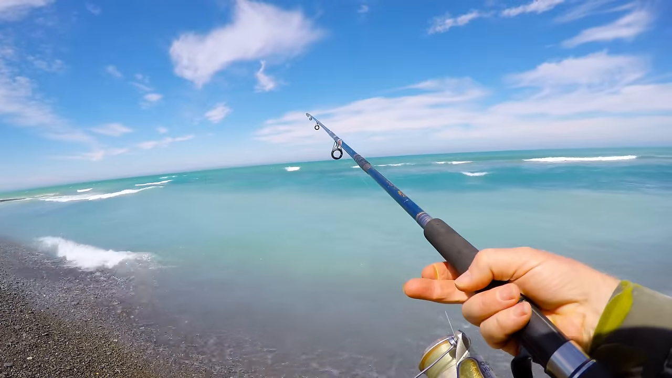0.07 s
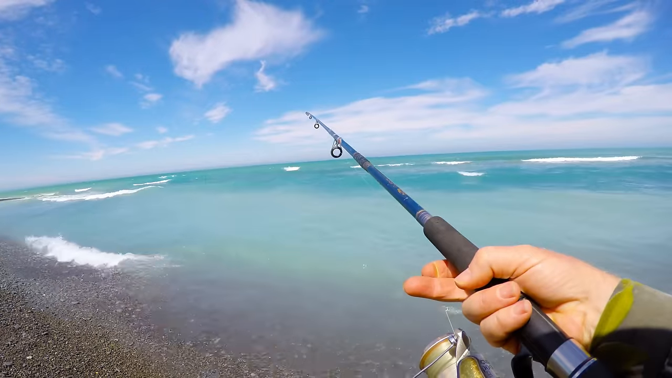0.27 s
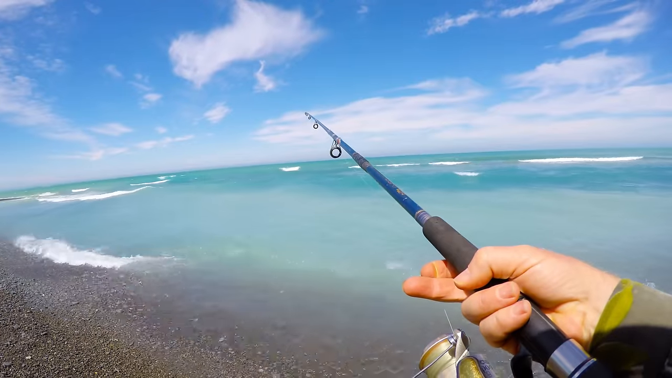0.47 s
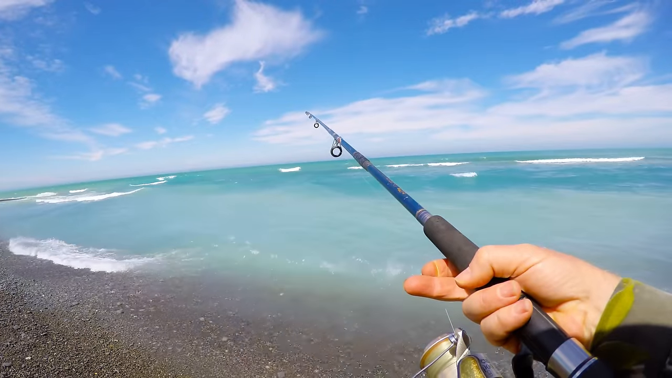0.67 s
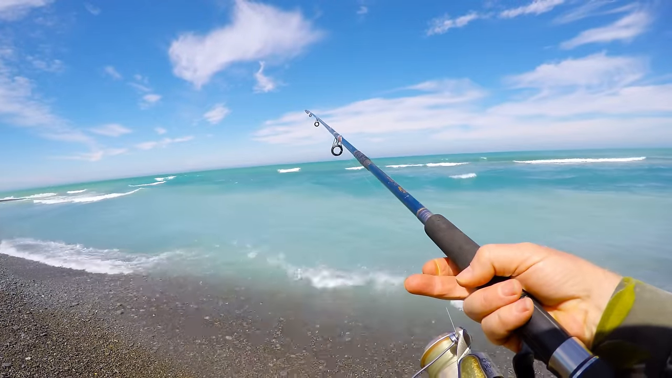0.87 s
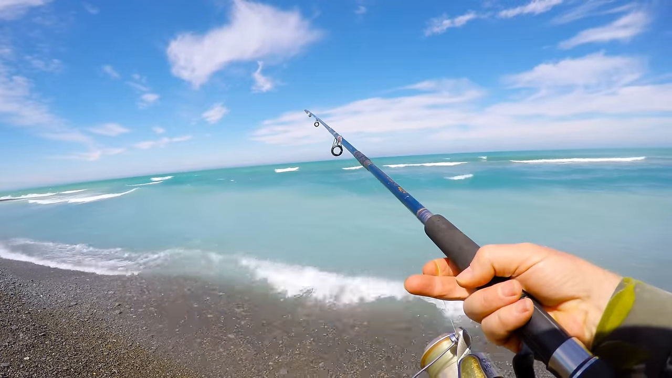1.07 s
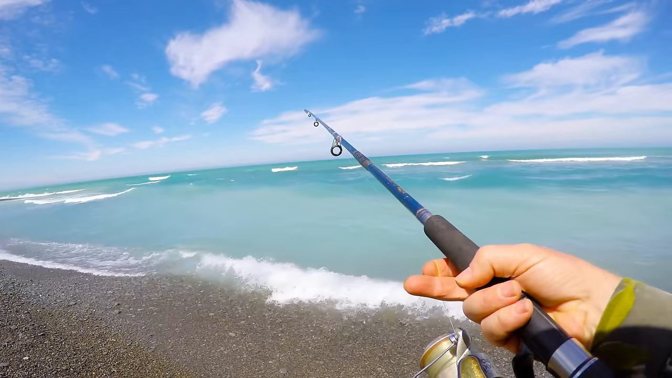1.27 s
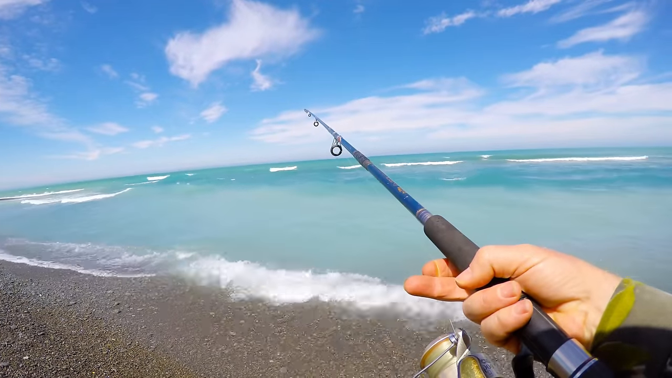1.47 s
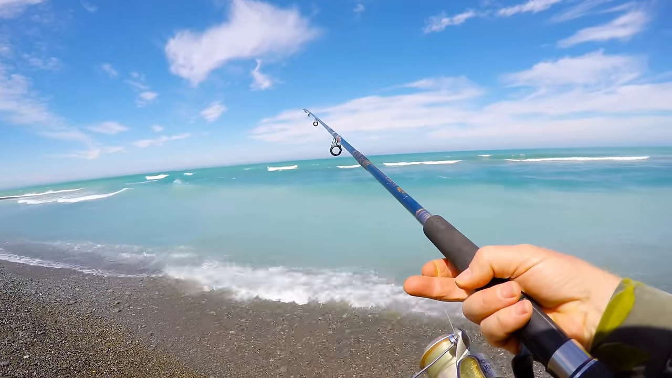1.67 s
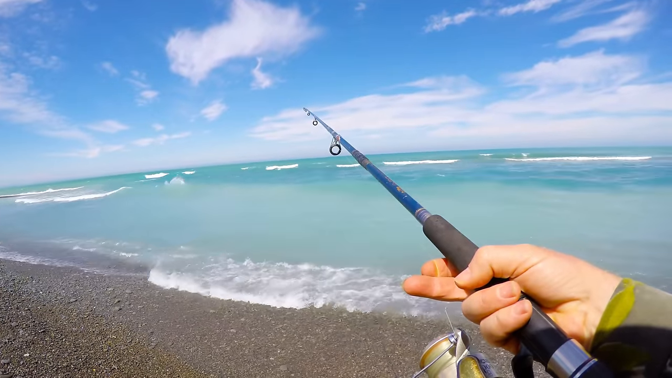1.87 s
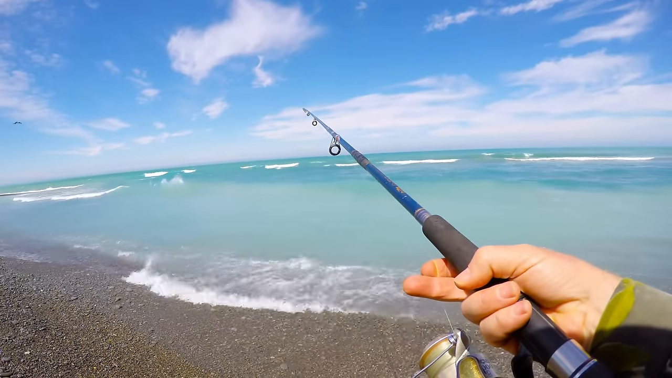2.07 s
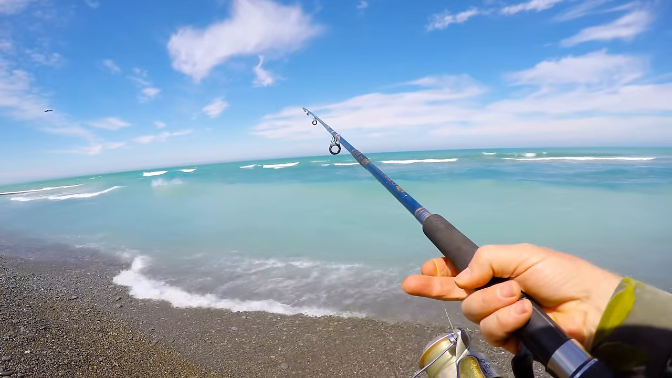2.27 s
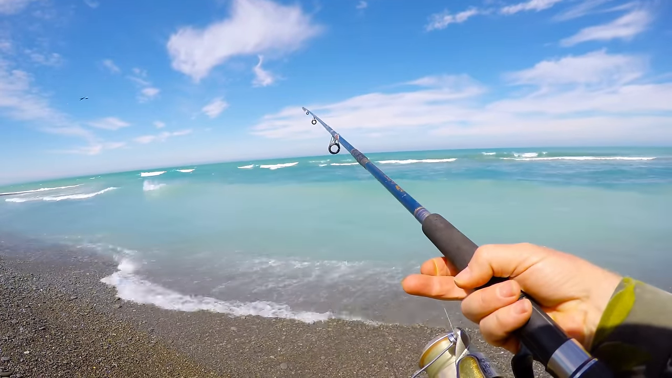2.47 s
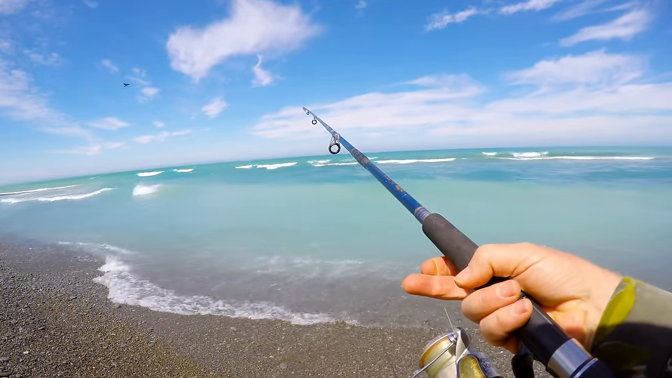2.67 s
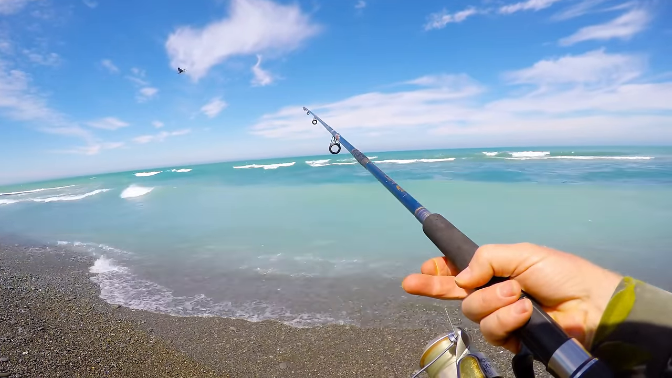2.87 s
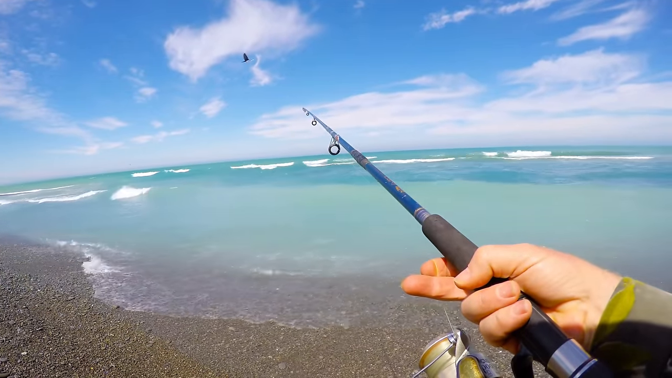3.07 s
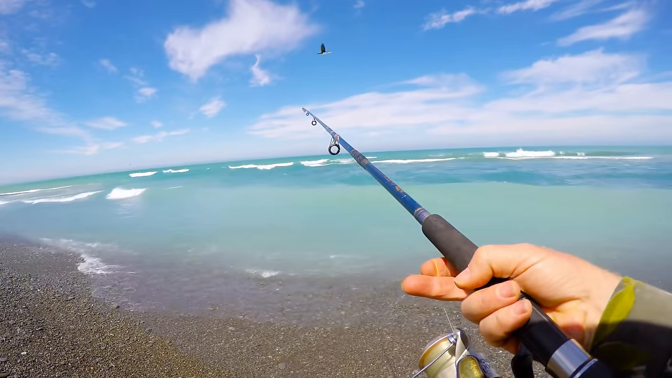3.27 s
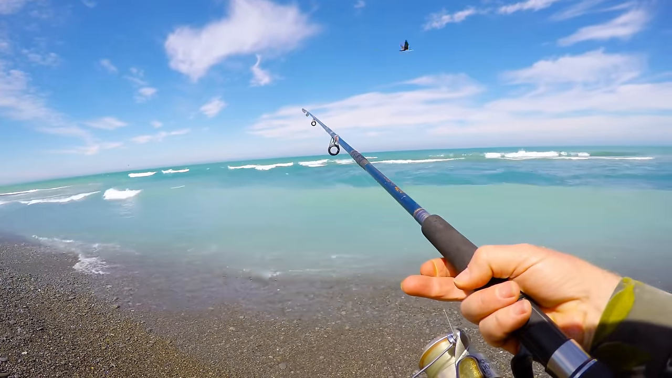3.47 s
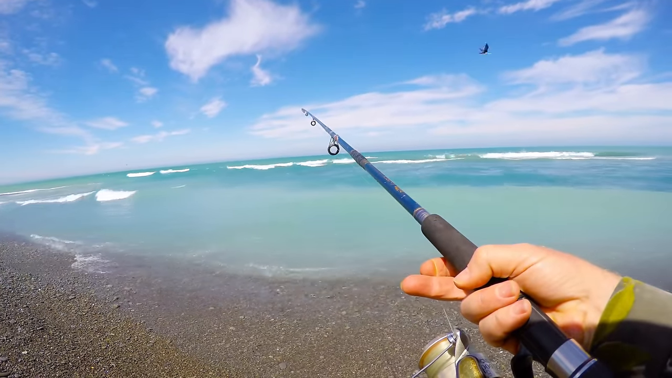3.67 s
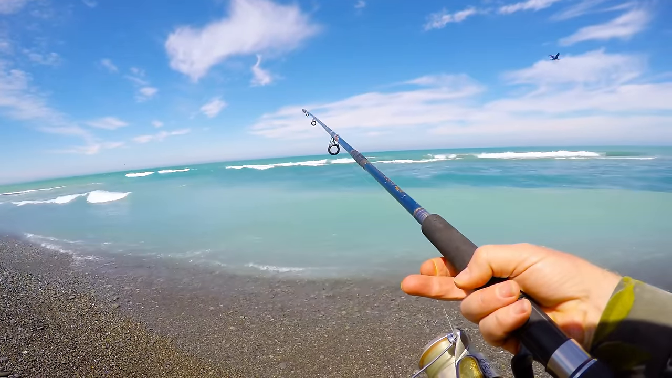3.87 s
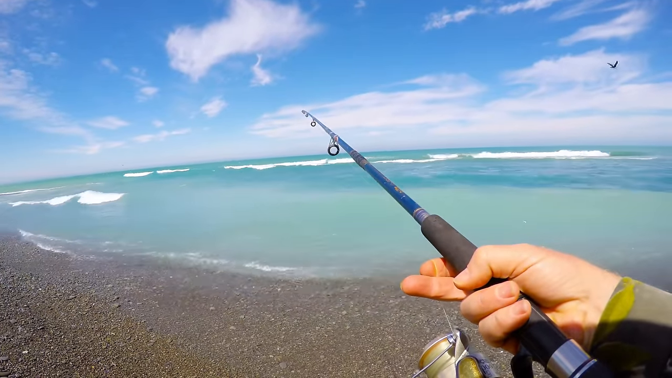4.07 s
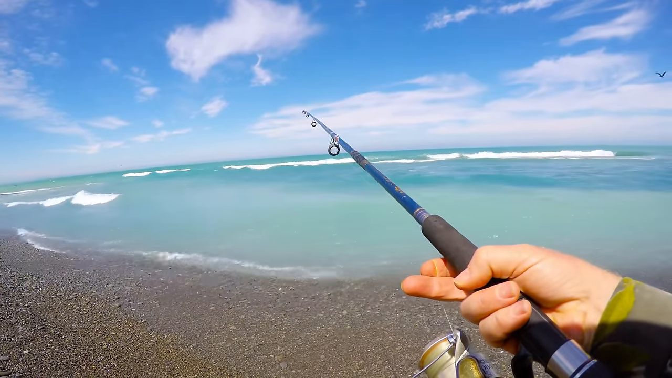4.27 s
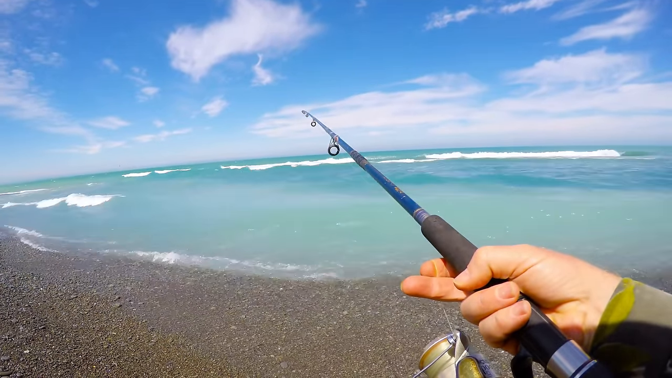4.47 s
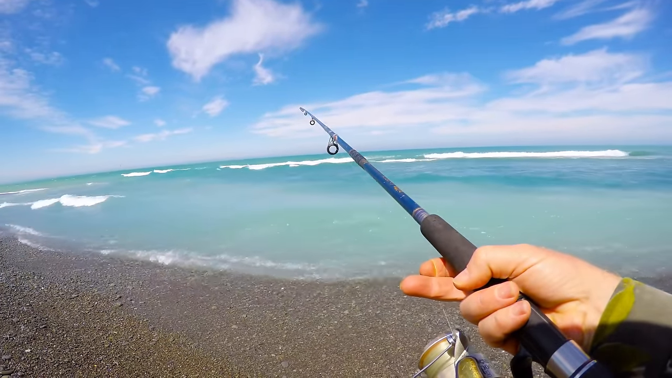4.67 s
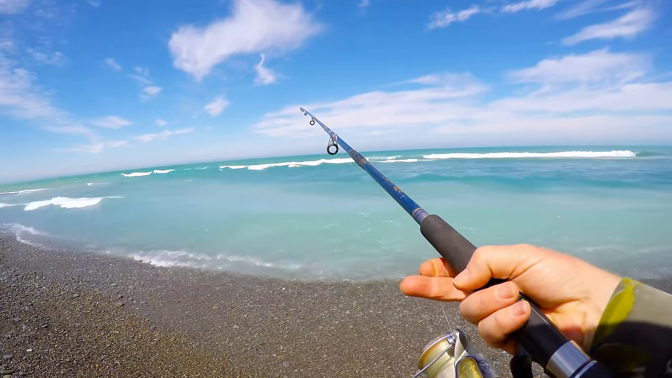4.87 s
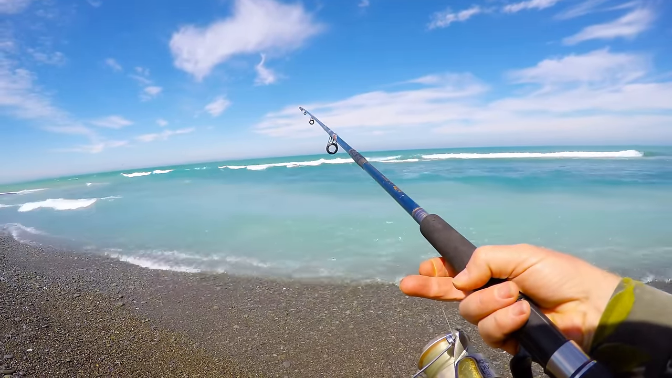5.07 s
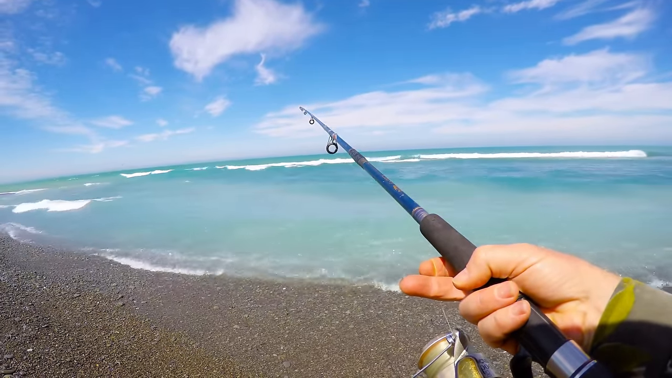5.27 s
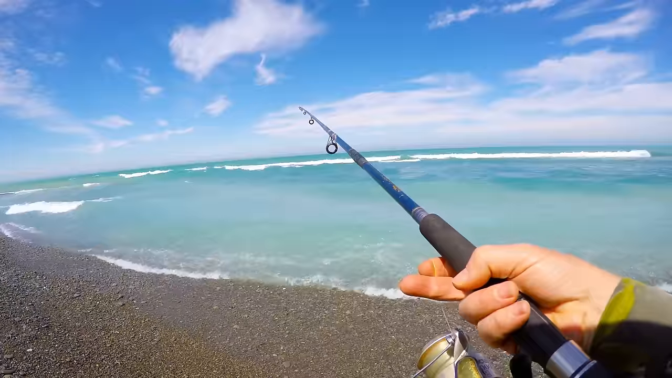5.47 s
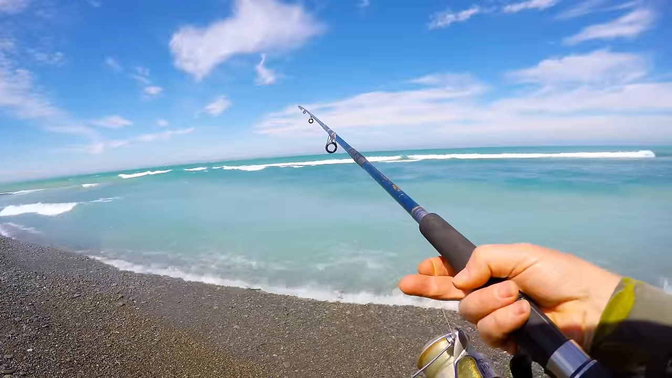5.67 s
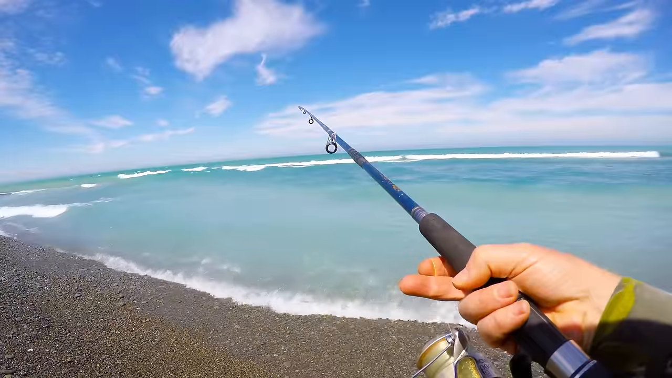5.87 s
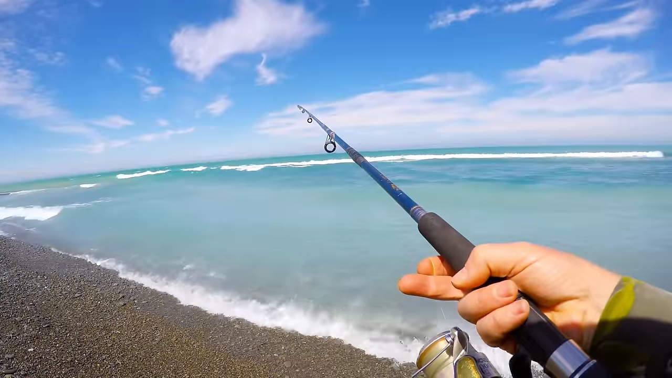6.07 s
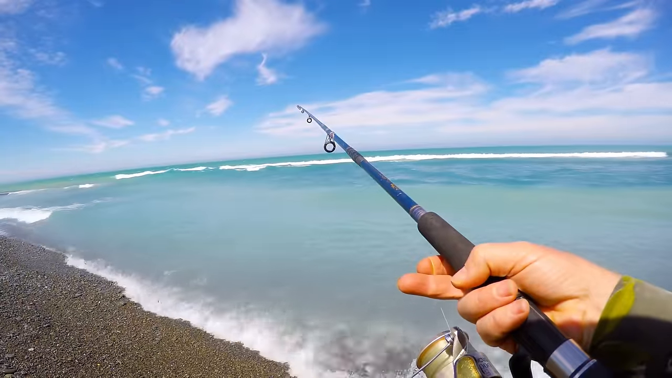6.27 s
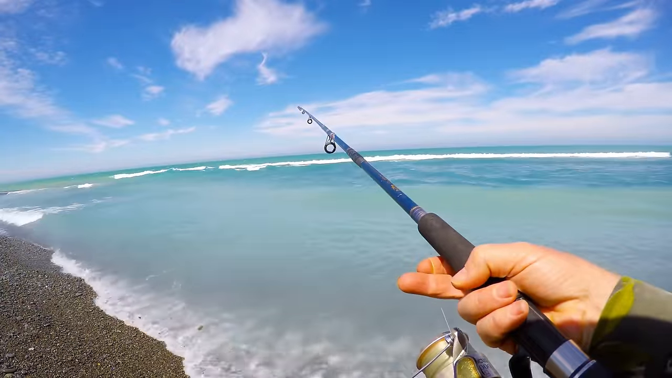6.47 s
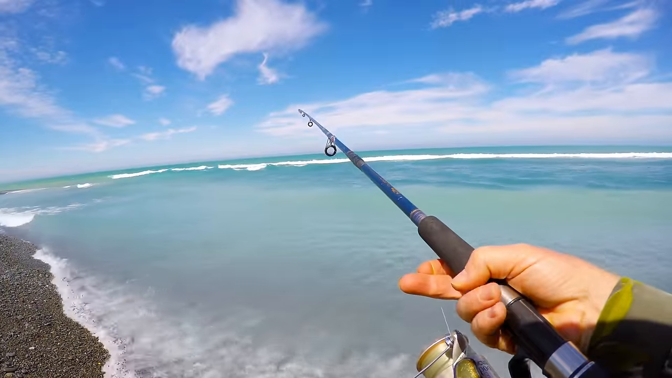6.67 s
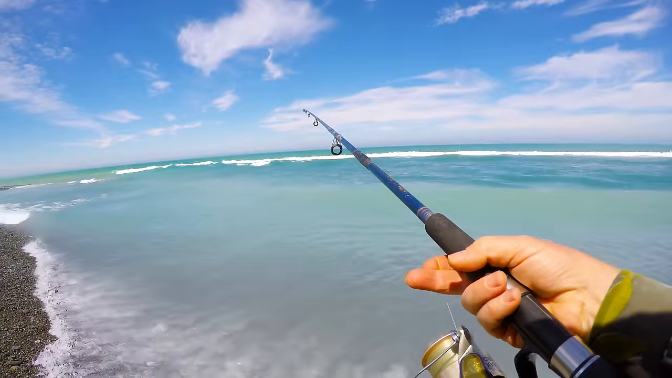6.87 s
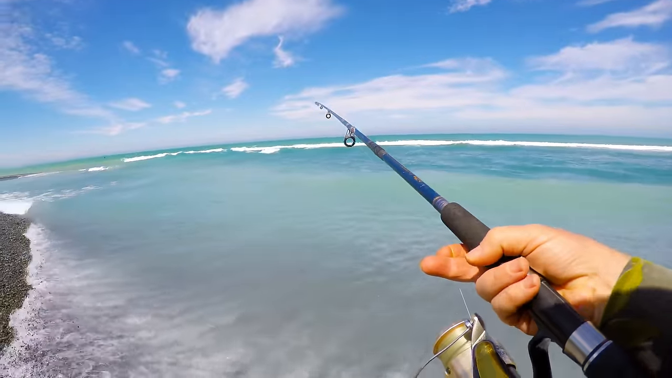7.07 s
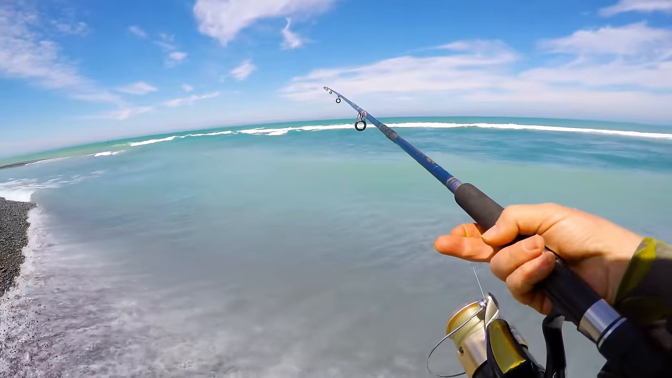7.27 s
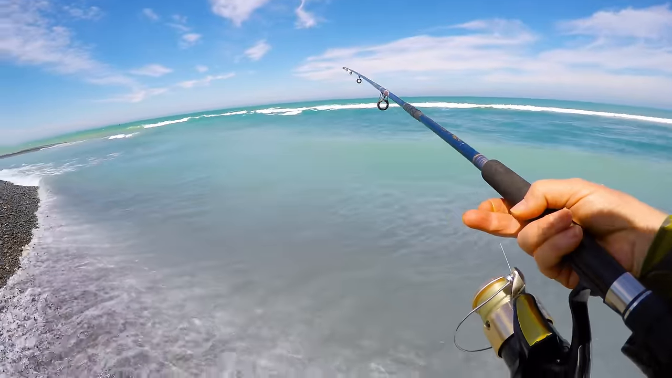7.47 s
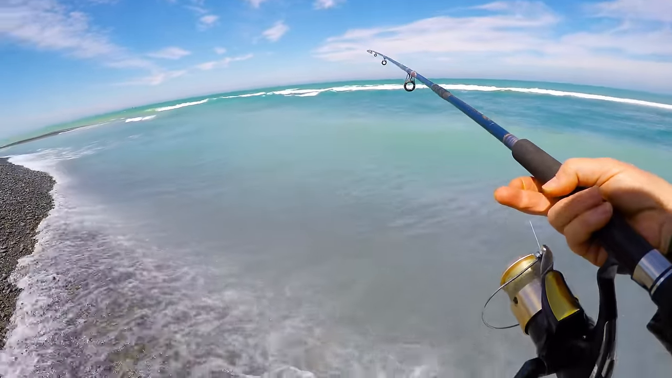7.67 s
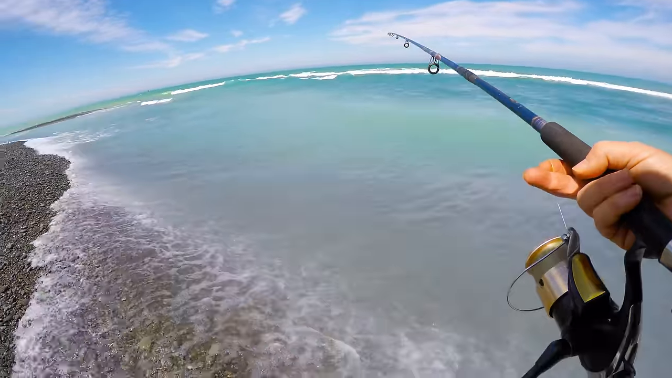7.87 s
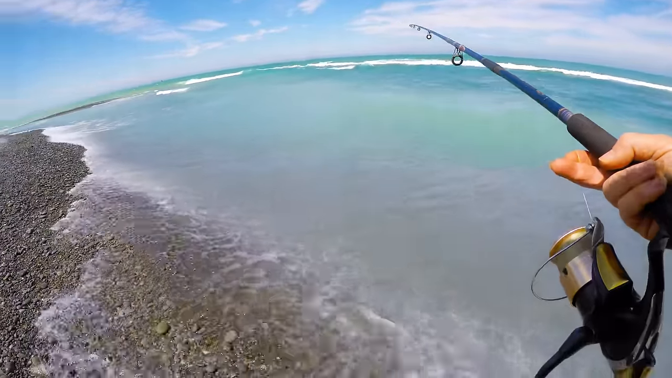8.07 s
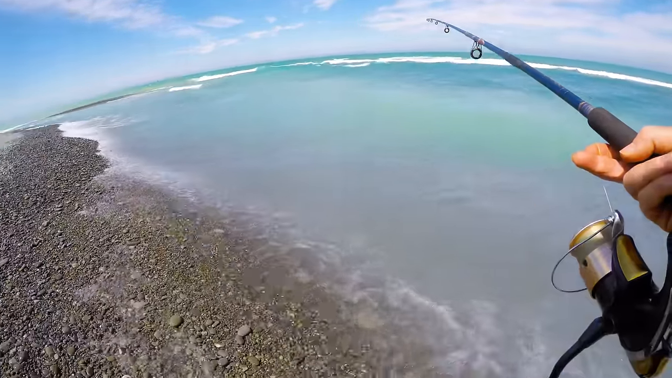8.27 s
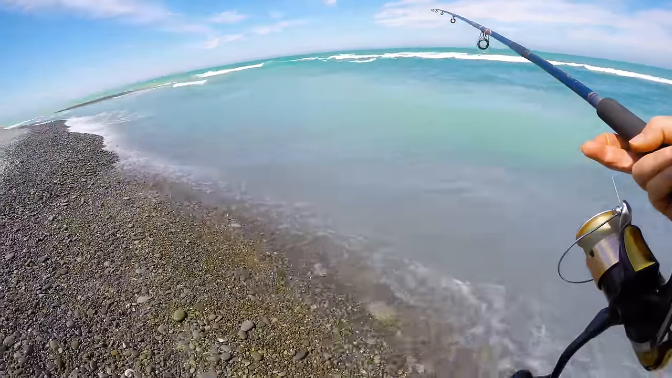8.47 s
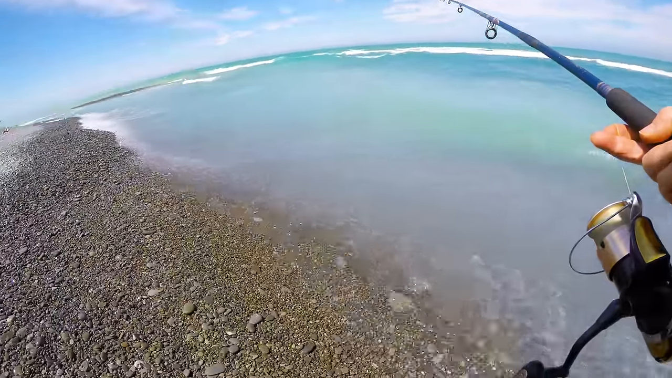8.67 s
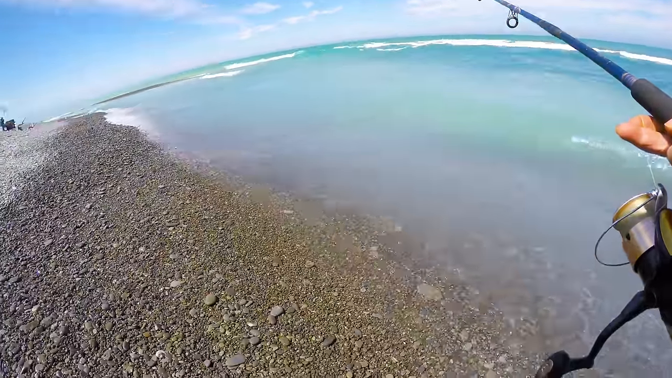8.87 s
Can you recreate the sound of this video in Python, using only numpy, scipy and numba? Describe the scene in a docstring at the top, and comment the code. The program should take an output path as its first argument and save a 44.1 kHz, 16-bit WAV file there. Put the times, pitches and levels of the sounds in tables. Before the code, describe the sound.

Close, narrow, slightly boxy sound of small waves on shingle. A splash and gulp come early, then a calm stretch with faint lapping, wind thumps and one tiny tick with a momentary dropout. Breaking water builds again, loudest near seven seconds, with clattering stones and foam, before draining away in a softer bubbly wash. Distant breakers and faint hiss stay beneath.

```python
"""On a gravel beach, small waves wash up and drain back, heard at the water's edge through a plastic housing.
Each wave stirs up clouds of short ringing grains: trapped air, small bubbles, knocking stones and fizzing foam.
Bursts of big bubbles gulp, and breakers roar far out as slowly swelling coloured noise.
Wind is low noise with gusts and short thumps; a faint tick marks a brief dip in level; a faint hiss lies beneath.
The housing gives all but the thumps, tick and hiss a hollow, nearly mono colour."""
import sys
import numpy as np
from scipy import signal
from scipy.fft import rfft, irfft, next_fast_len
from scipy.io import wavfile
from scipy.ndimage import uniform_filter1d
from numba import njit

SR = 44100
rng = np.random.default_rng(int(sys.argv[2]) if len(sys.argv) > 2 else 0)


def wav_record(signal):
    """Record a signal, one row per channel, as 16-bit PCM in the file named by sys.argv[1]."""
    frames = np.transpose(np.atleast_2d(signal))
    bounded = np.clip(frames, -1, 1)
    # unit amplitude maps onto the largest positive 16-bit level
    quanta = np.round(bounded * 32767).astype(np.int16)
    wavfile.write(sys.argv[1], SR, quanta)


N = 392931  # length [samples]
TIME = np.arange(N) / SR  # [s]


def undb(db):
    """Turn decibels into gain."""
    return 10 ** (np.asarray(db) / 20)


def together(gains):
    """Level [dB] of unrelated sounds heard at once: their powers add."""
    return 10 * np.log10(sum(g ** 2 for g in gains))


def swell(s, rise, fall):
    """A rounded hump of height 1 at time s."""
    age = TIME - s
    width = np.where(age < 0, rise, fall)
    return np.exp(-(age / width) ** 2)


def surge(s, rise, fade):
    """Builds up to 1 at time s, then dies away."""
    age = TIME - s
    return np.exp(-np.where(age < 0, (age / rise) ** 2, age / fade))


def walk(rate):
    """A wandering level: random steps, each held 1 / rate seconds, smoothed twice; spread near 1."""
    hold = max(int(SR / rate), 2)
    steps = np.repeat(rng.standard_normal(N // hold + 1), hold)
    smooth = uniform_filter1d(uniform_filter1d(steps, hold), hold)
    return 1.3 * smooth[:N]


def noise(side_db):
    """Stereo noise, nearly the same left and right."""
    mid, side = rng.standard_normal((2, N))
    return mid + undb(side_db) * side * np.array([[1], [-1]])


# Resonances and hollows of the plastic housing: (pitch [Hz], width [Hz], level [dB])
HOUSING_RESONANCES = [(312, 81, -4), (493, 56, -3.5), (630, 200, 1.5), (745, 115, -5.5), (1050, 120, 1),
                      (1288, 275, -4), (1696, 220, 3.5), (2385, 190, 3.5), (3075, 55, 3), (4013, 227, 5.5),
                      (4380, 140, -0.5), (4790, 470, -8), (5700, 190, 5.5), (6200, 290, 0),
                      (6800, 300, 7.5), (7200, 200, 1), (7730, 860, 3.5), (10680, 760, 4.5)]


def housed(x, colour, band, size=16384):
    """Filter x with its own colour and the ring of the housing; the left channel gets rms 1 within the band."""
    f = np.fft.rfftfreq(size, 1 / SR)
    points, levels = np.transpose(colour)
    db = np.interp(np.log(f + 1), np.log(points), levels)
    for hz, width, peak in HOUSING_RESONANCES:
        db = db + peak * .5 ** ((2 * (f - hz) / width) ** 2)
    # Folding the cepstrum forward makes a filter that rings only after the sound, never before it
    cepstrum = irfft(np.log(undb(db)))[:size // 2]
    cepstrum[1:] *= 2
    response = irfft(np.exp(rfft(cepstrum, size)))
    y = signal.fftconvolve(x, response[None], axes=1)[:, :N]
    length = next_fast_len(N)
    low, high = (int(hz * length / SR) for hz in band)
    inside = rfft(y[0], length)[low:high]
    return y / np.sqrt(2 * np.sum(np.abs(inside) ** 2) / (length * N))


@njit
def ring(start, hz, cycles, size, pan, glide):
    """Each grain is a sine that dies by 50 dB over its cycles while its pitch glides up."""
    out = np.zeros((2, N))
    for k in range(len(start)):
        n = int(cycles[k] * SR / hz[k]) + 2
        turn = 2 * np.pi * hz[k] / SR
        z = size[k] + 0j
        p = np.exp(1j * turn - 5.76 / n)  # one sample's turn and decay
        bend = np.exp(1j * turn * glide / n)
        for i in range(start[k], min(start[k] + n, N)):
            z *= p
            p *= bend
            out[0, i] += z.imag * (1 + pan[k])
            out[1, i] += z.imag * (1 - pan[k])
    return out


def grains(level_db, band, cycles, scatter_db, glide, spread, count):
    """A cloud of grains of uneven size, rms 1, that crowd together where the water is livelier."""
    when, pitch, length, strength, place = rng.random((count, 5)).T
    crowd = undb(level_db / 2)
    start = np.searchsorted(np.cumsum(crowd) / np.sum(crowd), when)
    hz = band[0] * (band[1] / band[0]) ** pitch
    rarity = -np.log(1 - .998 * strength)  # mostly small, now and then large
    size = undb(scatter_db * rarity) * hz  # short high grains need more height for the same weight
    pan = spread * (2 * place - 1)
    cloud = ring(start, hz, cycles * (.5 + length), size, pan, float(glide))
    cloud = cloud / np.sqrt(crowd)  # undo the loudness of crowding
    return cloud / np.std(cloud)


# A crest breaks at the water's edge:
# (time [s], rise [s], fade [s], froth level [dB], tumbling water level [dB])
BREAKING_CRESTS = [(0.99, .02, .32, -43.5, -58), (1.29, .07, .55, -45.5, -58), (2.08, .08, .16, -50, -65),
                   (4.461, .09, .2, -51, -61), (5.37, .2, .8, -49.5, -56), (5.97, .17, .4, -43.5, -51),
                   (6.45, .15, .5, -49, -53.5), (6.9, .11, .15, -40.5, -55), (7.22, .08, .25, -39, -51.5)]
# A sheet of water runs over the gravel, up or back: (peak time [s], rise [s], fall [s],
# shingle level [dB], froth level [dB], fizz level [dB], share of coarse stones [0-1])
WATER_SHEETS = [(0.03, .3, .48, -43, -49, -54, .35), (0.8, .6, 1.25, -53, -53, -61, 0),
                (6.03, .24, .3, -49.5, -52, -58, 0.1), (6.57, .3, .35, -46, -49, -50.5, 0),
                (6.92, .28, .44, -40.5, -45, -51, 0.57), (7.42, .3, .46, -41, -46.5, -61.5, 0.76),
                (8.65, .28, .6, -54, -44, -53, 0)]
# Ripples that lap between the waves: levels [dB] and share of coarse stones [0-1]
LAP_FROTH_DB, LAP_TUMBLE_DB, LAP_SHINGLE_DB, LAP_FIZZ_DB, LAP_COARSE = -54, -60.5, -58, -68.5, 0.82
SPRAY_DB, STIR_DB = -17, -13  # fizz and shingle that a break throws up, relative to its froth
CHURN_DB = -17  # tumbling water in a wash, relative to its shingle
TUMBLE_LINGER = 1.5  # the fade of trapped air is this many times longer than the froth's


def swash():
    """Over the lapping ripples, each break and each wash stirs up air pockets, bubbles, stones and foam."""
    air, bubbles = [undb(LAP_TUMBLE_DB)], [undb(LAP_FROTH_DB)]
    stones, foam = [undb(LAP_SHINGLE_DB)], [undb(LAP_FIZZ_DB)]
    coarse_power = LAP_COARSE * undb(LAP_SHINGLE_DB) ** 2
    for s, rise, fade, froth_db, tumble_db in BREAKING_CRESTS:
        crest = undb(froth_db) * surge(s, rise, fade)
        air.append(undb(tumble_db) * surge(s, rise, TUMBLE_LINGER * fade))
        bubbles.append(crest)
        stones.append(undb(STIR_DB) * crest)
        foam.append(undb(SPRAY_DB) * crest)
    for s, rise, fall, shingle_db, froth_db, fizz_db, coarse in WATER_SHEETS:
        flow = swell(s, rise, fall)
        rolling = undb(shingle_db) * flow
        air.append(undb(CHURN_DB) * rolling)
        bubbles.append(undb(froth_db) * flow)
        stones.append(rolling)
        foam.append(undb(fizz_db) * flow)
        coarse_power = coarse_power + coarse * rolling ** 2
    stones_db = together(stones)
    coarse_share = coarse_power / undb(stones_db) ** 2
    water = tumble(together(air)) + froth(together(bubbles))
    return water + shingle(stones_db, coarse_share) + fizz(together(foam))


# Colour of the small bubbles: (pitch [Hz], relative level [dB])
FROTH_COLOUR = [(400, -33), (900, -26.5), (1300, -2.5), (1700, 1), (2400, 1), (3500, -3.5), (4200, -2.5),
                (5000, -9.5), (7000, -24.5), (10000, -42), (14000, -39)]


def froth(db):
    """Masses of small bubbles ring in the foaming front."""
    bubbles = grains(db, (900, 9000), cycles=20.5, scatter_db=2.0, glide=0.16, spread=0.071, count=110000)
    return housed(bubbles, FROTH_COLOUR, band=(2800, 4600)) * undb(db)


# Colours of fine and of coarse stones knocking: (pitch [Hz], relative level [dB])
FINE_COLOUR = [(400, -29.5), (750, -9), (1000, -5.5), (1300, -2), (1700, 4), (2100, 1.5), (2500, 3.5),
               (3200, -7), (5000, -10), (10000, -50)]
COARSE_COLOUR = [(300, -34), (500, -4), (750, -14), (1000, 1), (1300, 1.5), (1700, 5.5), (2100, 10.5),
                 (2500, -5), (3200, -3.5), (10000, -56)]


def shingle(db, coarse_share):
    """Pebbles knock together as the water rolls them; the colour blends from fine to coarse stones."""
    knocks = grains(db, (600, 4500), cycles=10.5, scatter_db=1.5, glide=0, spread=.1, count=70000)
    fine = housed(knocks, FINE_COLOUR, band=(850, 1600))
    coarse = housed(knocks, COARSE_COLOUR, band=(850, 1600))
    return (fine + np.clip(coarse_share, 0, 1) * (coarse - fine)) * undb(db)


# Colour of foam and spray: (pitch [Hz], relative level [dB])
FIZZ_COLOUR = [(2000, -15.5), (4000, 7.5), (5700, 6), (7500, 0.5), (9000, -1), (12000, -6.5), (14500, -9)]


def fizz(db):
    """Foam bursts and spray patters on the wet stones, in small flurries."""
    pops = grains(db, (3500, 15000), cycles=23, scatter_db=1.0, glide=0.066, spread=.24, count=120000)
    flurries_db = 0.33 * walk(23)
    return housed(pops, FIZZ_COLOUR, band=(7000, 14000)) * undb(db + flurries_db)


# Colour of gurgling air pockets: (pitch [Hz], relative level [dB])
TUMBLE_COLOUR = [(70, -16), (150, -8.5), (250, 0.5), (400, -1), (650, -1.5), (1000, -12), (2000, -20)]


def tumble(db):
    """The wave folds over and traps large pockets of air that gurgle."""
    pockets = grains(db, (110, 1200), cycles=9.6, scatter_db=2.0, glide=0.092, spread=0.061, count=14000)
    return housed(pockets, TUMBLE_COLOUR, band=(300, 700)) * undb(db)


# A crest folds over with a hollow gulp: (time [s], level [dB], half length [s])
HOLLOW_GULPS = [(0.835, -57, 0.047), (1.174, -53.5, 0.076), (1.27, -49.5, 0.046), (6.0, -56, .04)]
# Colour of the big bubbles: (pitch [Hz], relative level [dB])
GULP_COLOUR = [(80, -25), (170, -6), (240, 7), (300, -4.5), (450, -9), (2000, -56)]


def gulps():
    """The air tube under a plunging crest breaks into a short burst of big bubbles."""
    bursts = sum(undb(db) * swell(s, length, length) for s, db, length in HOLLOW_GULPS)
    pockets = grains(np.zeros(N), (140, 400), cycles=20, scatter_db=1.5, glide=0.16, spread=0.06, count=2500)
    return housed(pockets, GULP_COLOUR, band=(140, 400)) * bursts


# Colour of the distant roar: (pitch [Hz], relative level [dB])
FAR_SURF_COLOUR = [(60, -10.5), (130, 4.5), (250, -1.5), (600, -5), (1200, -15), (3000, -0.5), (8000, -30)]
SEA_DB, SEA_SWELL_DB = -64, 2  # level of the roar and the spread of its slow rise and fall


def far_surf():
    """Breakers on the outer bar merge into a slowly swelling roar."""
    roar = housed(noise(side_db=-24.5), FAR_SURF_COLOUR, band=(300, 700))
    return roar * undb(SEA_DB + SEA_SWELL_DB * walk(0.22))


# Gusts: (time [s], level over the breeze [dB], half length [s])
WIND_GUSTS = [(1.35, 3, 0.41), (2.3, 2.5, 0.27), (3.0, 4.5, 0.15), (6.885, 4.5, 0.062), (8.2, 2.5, 0.48)]
# Short low thumps of wind; the weak pulse at 3.465 s makes a faint tick where the level drops:
# (time [s], peak level [dB], pitch [Hz], half length [s])
LOW_PULSES = [(2.257, -31, 44.3, 0.026), (2.311, -28, 46.6, 0.01), (3.17, -29.5, 45, 0.023),
              (3.465, -36, 42.6, 0.0063), (4.272, -28, 40, 0.019), (8.092, -24, 27.8, 0.023),
              (8.161, -22.5, 32.6, 0.017), (8.248, -28, 32.5, 0.047), (8.367, -20.5, 42, 0.017)]
# Colour of the wind's rumble: (pitch [Hz], relative level [dB])
WIND_COLOUR = [(5, -20), (12, -20), (24, 2.5), (40, -4), (60, -5), (75, -11), (95, -12), (130, -19.5),
               (200, -27.5), (400, -38), (1500, -83)]
BREEZE_DB = -44  # steady wind on the microphone


def wind_and_tick():
    """Turbulence rumbles on the housing and swells in gusts; short low pulses add wind thumps and one tick."""
    db = BREEZE_DB + sum(over_db * swell(s, length, length) for s, over_db, length in WIND_GUSTS)
    low_sound = housed(noise(side_db=-31), WIND_COLOUR, band=(35, 150)) * undb(db)
    for s, peak_db, hz, length in LOW_PULSES:
        envelope = undb(peak_db) * swell(s, length, length)
        low_sound = low_sound - envelope * np.cos(2 * np.pi * hz * (TIME - s))
    return low_sound


def microphone_hiss():
    """Faint, even hiss, unrelated in the two channels."""
    return undb(-81) * rng.standard_normal((2, N))


def scene():
    """The swash close by, the sea behind it, the wind with the tick, and the hiss."""
    return swash() + gulps() + far_surf() + wind_and_tick() + microphone_hiss()


DIP_S, TOP_HZ = 3.468, 14500  # time of the brief dip in level [s]; upper limit of the sound [Hz]


def record(dry):
    """The level drops for an instant and comes back within 24 ms; the top is cut steeply."""
    age = TIME - DIP_S
    gain = np.where(age < 0, 1, np.clip(0.11 + age / 0.026, 0, 1))
    top_cut = signal.ellip(12, .1, 80, TOP_HZ, fs=SR, output="sos")
    return signal.sosfilt(top_cut, dry * gain)


dry = scene()
out = record(dry)
wav_record(out)
```